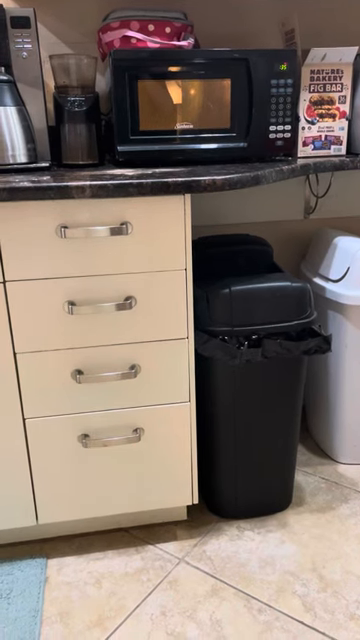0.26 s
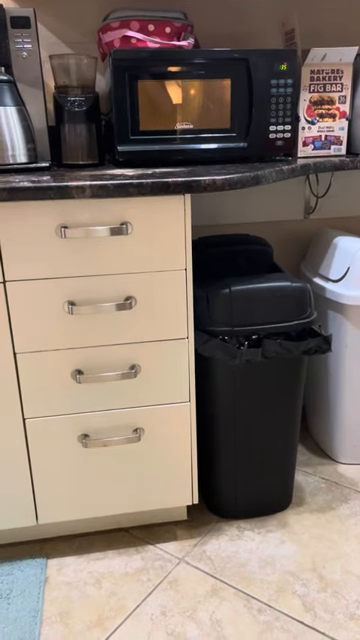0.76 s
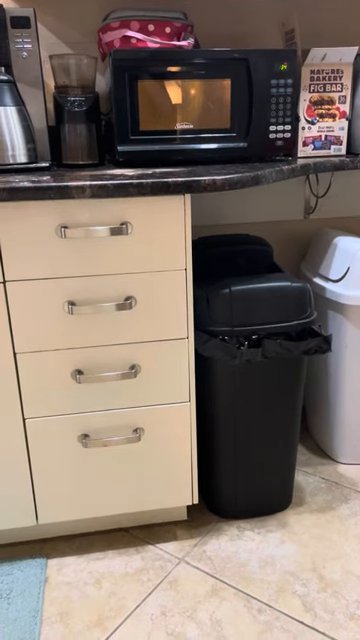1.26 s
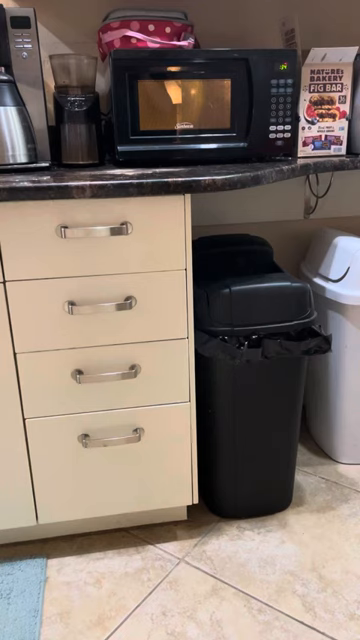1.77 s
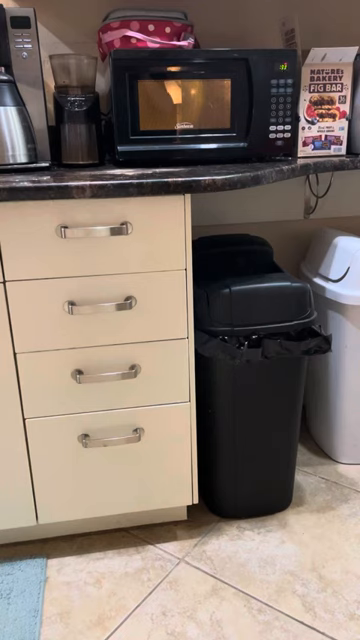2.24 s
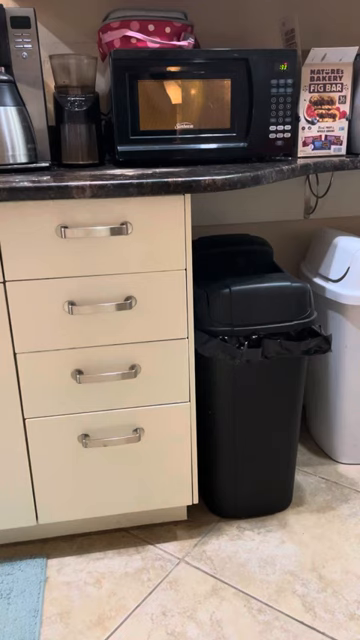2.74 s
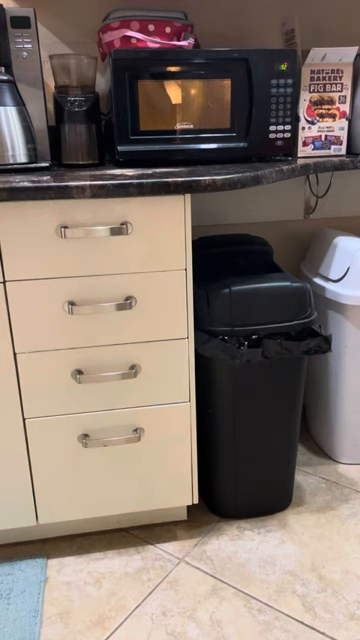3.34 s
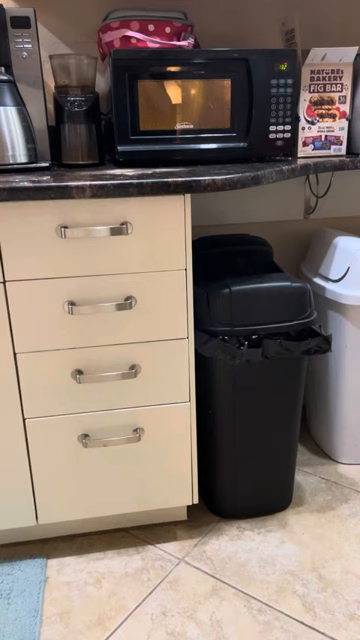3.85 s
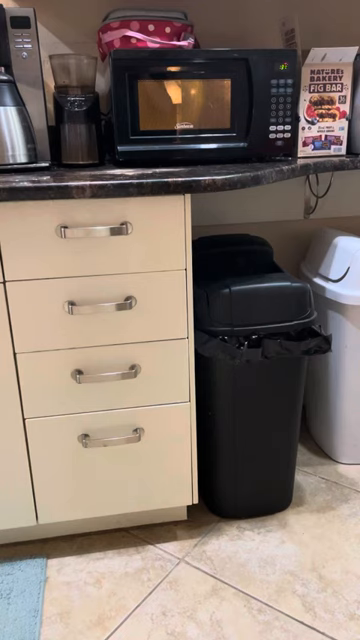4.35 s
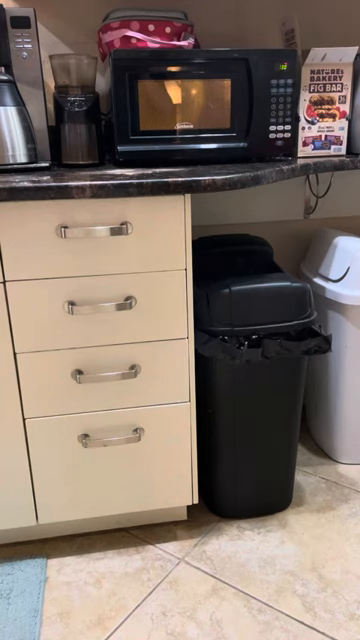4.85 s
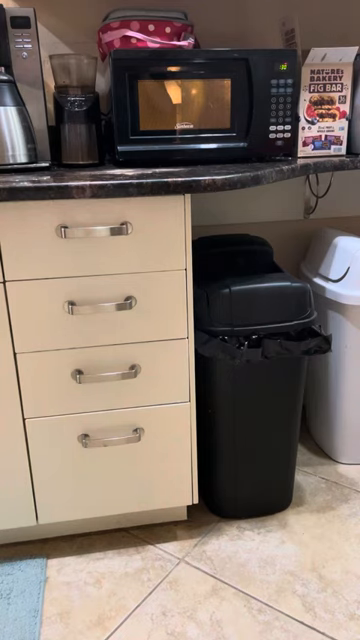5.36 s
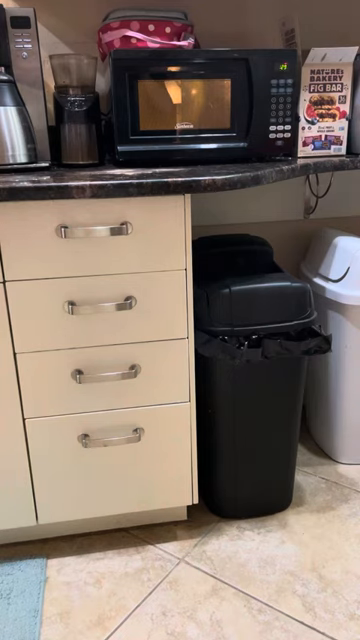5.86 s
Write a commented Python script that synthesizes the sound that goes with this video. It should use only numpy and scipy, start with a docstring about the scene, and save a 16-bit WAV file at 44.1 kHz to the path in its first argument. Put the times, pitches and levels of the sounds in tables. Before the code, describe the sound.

Steady low microwave drone and soft fan rush, interrupted by irregular bursts of woody thumps, probably footsteps, and a few tiny clicks and clinks.

```python
"""A microwave oven hums on a kitchen counter: steady mains and fan tones over the shaped noise of its fan.
It is heard from across a tiled floor. Dull thumps, probably steps, land in small clusters: dying sines
ring the floor and cabinets, with a burst of clicks on top. Light ticks are puffs of noise and short rings.
A thin whistle of gliding noise comes and goes. Two close microphone ports hear left-right difference."""
import sys
import numpy as np
from scipy import signal
from scipy.fft import rfft, irfft
from scipy.io import wavfile
from scipy.ndimage import uniform_filter1d

SR = 44100
rng = np.random.default_rng(int(sys.argv[2]) if len(sys.argv) > 2 else 0)


def master_out(mix):
    """Clip the mix to full scale and print it as 16-bit PCM to the path in sys.argv[1]."""
    frames = np.transpose(np.atleast_2d(mix))
    ceiling = np.clip(frames, -1, 1)
    pcm = np.round(ceiling * 32767).astype(np.int16)
    wavfile.write(sys.argv[1], SR, pcm)


N = 269010  # length in samples

# Transformer hum tones: mains_multiple, level_db
HUM_TONES = [(2, -47.5), (3, -48.5), (4, -41.5), (5, -60.5), (6, -44), (8, -58), (10, -60.5), (11, -62),
             (15, -73.5)]
# Fan motor tones: pitch_hz, level_db
FAN_TONES = [(49, -67), (163.5, -51.5), (327, -52.5)]
# Colour of the air rush in the port sum, then in the difference: pitch_hz, relative_level_db
RUSH_COLOUR = [(15, -66), (25, -33.5), (65, -13.5), (108, -7), (190, -9.5), (237, -5.5), (288, -10),
               (359, -8), (415, -16), (614, -8.5), (953, -25.5), (2730, -36), (5020, -48), (7800, -60.5),
               (8600, -68.5), (11200, -106), (18900, -120)]
RUSH_SIDE_COLOUR = [(35, -81), (60, -57), (227, -5), (363, -5), (417, -8), (621, -4.5), (1440, -17),
                    (1820, -26.5), (2460, -18.5), (3660, -23.5), (4420, -34), (7920, -36.5), (16000, -60)]
# Resonances of the oven case: pitch_hz, width_hz, lift_db
CASE_RESONANCES = [(175, 32, 0), (244, 66, 0), (537, 310, 3), (1400, 6.6, 13), (2080, 55, 4), (2680, 65, 9),
                   (5090, 200, 4)]
# Level of the hiss against the rest of the rush: time_s, lift_db
HISS_LEVEL = [(0, 5.5), (.6, 6.5), (2.2, 6), (3.4, 5.5), (4.1, 8.5), (4.9, 10), (5.7, 5), (6.1, 8)]
# Thumps: start_s, knock_level_db, knock_pitch_hz, knock_length (factor), then low_ring_db, boom_db,
# slap_db, grit_db (all relative to the knock), crack_pitch_hz
THUMPS = [(0.679, -31.5, 590, 1, 4, -6, -18.5, -14, 1730),
          (0.709, -39.5, 650, 0.47, 12.5, 7, -13, -20, 2760),
          (0.747, -33.5, 640, 0.62, 3, -1, -17.5, -20, 2600),
          (1.036, -27, 582, 1.2, -8.5, -12, -18.5, -32, 2600),
          (1.067, -18.5, 531, 1.7, 3.5, -11, -13, -10, 2300),
          (1.091, -13.5, 665, 1, 1.5, -10, -14.5, -21, 2890),
          (1.102, -13.5, 662, 1.2, -1.5, -12.5, -18.5, -24, 3940),
          (1.117, -16.5, 678, .9, 5.5, 3.5, -22, -20.5, 1467),
          (1.133, -20.5, 680, .9, -6, -1, -24.5, -27, 2960),
          (1.155, -24, 632, 0.78, -12, -9.5, -26, -19.5, 2835),
          (1.197, -32.5, 664, 0.61, -7, -18, -16.5, -21.5, 1480),
          (1.541, -32, 650, 0.61, -0.5, -12, -22, -26, 1770),
          (1.577, -27.5, 696, 0.73, 0.5, -20, -21.5, -30.5, 2640),
          (1.96, -41, 654, .9, 5.5, 2, -19, -30, 2790), (2.4, -34, 600, 0.73, -18.5, -21, -24, -26.5, 2750),
          (2.444, -33.5, 645, 1.2, -14, 2, -22.5, -27.5, 2750),
          (2.631, -27, 638, .6, -7.5, -14, -27, -23.5, 2164),
          (2.654, -34.5, 590, 0.74, 9, -10.5, -15.5, -26, 2600),
          (2.686, -36, 640, .9, -3, 0.5, -17, -26.5, 2700),
          (2.737, -21, 640, 0.58, -8.5, -18, -26, -41.5, 2630),
          (2.76, -34, 570, .9, 2, -0.5, -18.5, -32, 2170),
          (2.793, -45.5, 657, .9, 6, -6, -13.5, -28.5, 1450),
          (2.992, -21, 650, 1, 0.5, -17, -15, -18, 1654), (3.04, -27, 617, .9, -4.5, -14, -18, -29, 2810),
          (3.062, -26, 632, 1.6, -4, -5.5, -23.5, -22, 1950),
          (3.087, -27, 647, 2.3, -6, -9, -16.5, -28.5, 1980),
          (3.109, -17.5, 712, 0.48, -23.5, -26, -16, -19.5, 4000),
          (3.114, -8, 730, .55, -9, -20.5, -28.5, -34.5, 2820),
          (3.141, -27, 597, 0.46, 6, 4.5, -8.5, -21.5, 2910), (3.16, -29.5, 604, 0.7, 6, 0, -15, -23, 2910),
          (3.171, -31.5, 585, 1.3, 5, -1, -24, -28.5, 3100),
          (4.179, -30.5, 650, 0.76, 3.5, 0, -23, -22, 2700),
          (4.218, -31.5, 640, 0.98, -18.5, -24, -22, -25.5, 2680),
          (4.465, -20.5, 653, .9, 0, -16.5, -18, -22, 2190),
          (4.488, -4, 665, 0.51, -5, -26, -23, -27, 3780),
          (4.501, -12, 670, 0.38, -3.5, -10, -22.5, -26.5, 4580),
          (4.529, -19.5, 554, 0.92, 3.5, -17, -13, -18, 2380),
          (4.543, -25, 656, 0.97, -9, -9, -11.5, -9, 1850),
          (4.557, -15, 728, 0.97, -7.5, -9, -22, -22.5, 1546),
          (4.578, -20.5, 730, .8, -2.5, -6, -22, -22, 2400),
          (4.599, -21, 697, .8, -7.5, -13.5, -21, -23, 2460),
          (5.813, -40.5, 650, 1, 1, -10, -19.5, -28.5, 1970)]
# Floor and cabinet modes: pitch_hz, relative_level_db, time_to_fall_60_db_s
BODY_MODES = [(70.6, -16.5, 0.23), (92.8, -7, 0.22), (108.6, 0, 0.21), (130, -20, 0.056), (161.3, -8, 0.41),
              (182.7, -4.5, 0.16), (220.9, 4, 0.13), (272.2, -1.5, 0.25), (304, -1, 0.074),
              (372.8, -3, 0.29), (446.7, -1.5, 0.34), (476.5, -5, 0.13), (523, -5.5, 0.19),
              (577.4, -3, 0.048), (608, 0.5, 0.056), (660.4, -2, 0.093), (716, -3.5, 0.081),
              (824, -11.5, 0.062), (910, -14, 0.031), (1014, -7.5, 0.04)]
# Colours of the slap and of the grit in a thump: pitch_hz, relative_level_db
SLAP_COLOUR = [(530, -35), (900, -11.5), (1200, -4.5), (1430, 0), (1550, -4), (2220, -8), (2420, -11.5),
               (2690, -7), (3400, -19), (4420, -35.5), (7480, -120)]
GRIT_COLOUR = [(1880, -30), (3200, -4.5), (3940, -7), (4240, -3.5), (5260, -11), (7470, -15), (12700, -27),
               (15100, -25), (16000, -25.5)]
# Thumps and ticks in the port difference: pitch_hz, gain_db
THUMP_SIDE_GAIN = [(60, -38.5), (110, -57), (200, -29.5), (380, -17.5), (700, -14.5), (1290, -3),
                   (1900, -12.5), (2500, -1), (3500, -3.5), (16000, -2.5)]
# Ticks made of noise: start_s, level_db (before fading), centre_hz, fade_time_constant_s
PUFFS = [(0.892, -52, 6550, 0.013), (1.272, -46.5, 6780, 0.015), (1.588, -54.5, 6070, 0.012),
         (3.454, -60, 9000, 0.0064), (3.694, -55.5, 5940, 0.012), (3.922, -52, 6850, 0.0084),
         (4.946, -42.5, 2610, 0.0097), (5.092, -54, 6800, 0.031), (5.699, -65, 7920, 0.025),
         (5.966, -64, 6900, 0.2)]
# Small clinks: start_s, level_db, tilt_db_per_octave (above the lowest mode)
CLINKS = [(5.1542, -38.5, 0), (5.206, -50, -29), (5.391, -42.5, -1.5), (5.399, -43.5, -0.5),
          (5.439, -50, -20)]
# What the clinks ring with: pitch_hz, relative_level_db, time_to_fall_60_db_s
CLINK_MODES = [(2620, -3, 0.049), (2850, -5, 0.035), (3820, -4, 0.03), (4080, -1.5, 0.03),
               (6480, -14.5, .06), (8450, -16, .09), (13700, -9, 0.036), (14050, -8.5, .06)]
# Snaps, a hard edge ringing inside the loud thumps: start_s, level_db, pitch_hz, time_to_fall_60_db_s
SNAPS = [(1.067, -35, 2065, 0.048), (1.07, -43, 5850, .04), (1.071, -42.5, 3960, .03),
         (1.106, -37.5, 4500, 0.028), (1.178, -39.5, 1450, .05), (2.994, -37.5, 2340, 0.048),
         (3, -42, 1560, 0.056), (3.008, -37, 2316, .04), (3.109, -41, 3810, 0.056),
         (3.111, -46.5, 4840, .04), (3.113, -45, 2730, .05), (4.494, -26.5, 4400, 0.058),
         (4.496, -33.5, 1494, 0.048), (4.548, -37, 2310, 0.027), (4.577, -35.5, 1610, 0.045)]
# Thin whistle, one table a strand: time_s, pitch_hz, level_db
WHISTLE_STRANDS = [
    [(3.95, 6950, -84), (4.1, 6360, -72), (4.25, 5930, -66.5), (4.32, 5800, -69), (4.4, 6000, -74),
     (4.83, 5910, -71.5), (4.9, 5880, -78), (5.02, 5900, -77), (5.1, 5660, -85)],
    [(3.7, 5140, -80), (3.9, 5470, -75), (4.1, 5500, -71), (4.3, 5300, -73)],
    [(3.72, 7300, -82.5), (3.9, 7260, -83), (4.1, 7540, -79), (4.2, 7550, -80)],
]
# Share of the difference that is the sum a quarter cycle ahead: pitch_hz, share (-1 to 1)
AHEAD_SHARE = [(100, 0.086), (900, -0.73), (1460, 0.74), (1900, -0.06), (2700, .6), (3600, 0), (4700, .2),
               (5600, .6), (8000, 0.74), (16000, .8)]
# Share of the difference that is the sum in step, heard as a lean to the left: pitch_hz, share (-1 to 1)
LEFT_SHARE = [(100, .4), (300, 0.54), (600, .4), (1000, 0.59), (2000, 0), (16000, 0.059)]
# How fast the room falls silent: pitch_hz, time_to_fall_60_db_s
ROOM_DECAY = [(100, 0.16), (500, 0.35), (2000, 0.29), (6000, 0.27), (16000, 0.31)]
# Level of the room sound; the low modes already hold the room: pitch_hz, gain_db
ROOM_GAIN = [(200, -26.5), (400, -11), (700, -3), (1000, 3.5), (3000, -1.5), (8000, 2)]
# Treble dipping deeply in the port sum: pitch_hz, gain_db
SUM_TREBLE_DIP = [(3500, -1.5), (5000, -1.5), (7500, -3), (9000, -14.5), (12000, -50.5), (14000, -13),
                  (15000, -7.5)]

MAINS_HZ, EDGE_HZ = 60, 15750
RUSH_DB, RUSH_SIDE_DB = -44, -59  # before the slow changes
WAVER_DB, PATCH_DB = 0.5, 2.5  # typical wander of the hum tones and of the air patches
HUM_SCATTER, LOW_SCATTER, KNOCK_SCATTER = 0.19, 0.4, 0.57  # starting phases, in cycles
BOOM_TOP_HZ, LOW_RING_TOP_HZ = 140, 420  # where the three groups of body modes meet
BLOW_RISE_S, KNOCK_RISE_S, CRACK_RISE_S = 0.0041, 0.0012, 0.0025
KNOCK_LAG_S, KNOCK_SPREAD, DETUNE = 0.00517, 0.063, 0.015  # the two spreads are shares of the pitch
BOUNCE_S, BOUNCE_SPREAD, BOUNCE_DB, BOUNCE_CRACK_DB = 0.013, 0.2, -9.5, -1.5
CRACK_OVERTONE, SNAP_PAIR = 1.42, 0.045  # pitch ratio, and share of the pitch to either side
ECHO_SPREAD_DB = 3.5  # some reflections stand out, so tails break into grains


def gain_of(db):
    """Turns decibels into amplitude."""
    return 10 ** (np.asarray(db) / 20)


def evened(x):
    """Scales a signal to rms 1."""
    return x / np.sqrt(np.mean(x ** 2) + 1e-20)


def read(points, hz):
    """Reads a table of pitch and value, with pitch on a log axis."""
    f, value = np.transpose(points)
    return np.interp(np.log(hz + 1), np.log(f + 1), value)


def add(mix, start_s, sound):
    """Mixes a sound in at its start time."""
    part = mix[round(start_s * SR):][:len(sound)]
    part += sound[:len(part)]


def rise(t, time_s):
    """A smooth swell from silence to full level."""
    return 1 - np.exp(-t / time_s)


def slow_drift(top_hz):
    """Slow random wander of rms 1: a sum of sines of chance phase, weaker as they get faster."""
    t = np.arange(0, N + 64, 64) / SR
    speeds_hz = np.geomspace(top_hz / 20, top_hz, 20)
    waves = sum(np.sin(2 * np.pi * (f * t + rng.random())) / np.sqrt(f) for f in speeds_hz)
    return np.interp(np.arange(N) / SR, t, evened(waves))


def difference(near, other, tie):
    """Spectrum of the port difference at the level of the sum: partly tied to it, the rest unrelated."""
    hz = np.fft.rfftfreq(N, 1 / SR)
    share = tie * (read(LEFT_SHARE, hz) + 1j * read(AHEAD_SHARE, hz))
    share /= np.maximum(abs(share), 1)
    return share * rfft(near) + np.sqrt(1 - abs(share) ** 2 + 1e-9) * rfft(other)


def ring(modes, t, phase, centre_hz=1000, reach=10):
    """Dying sines, as from a struck object; the blow drives most the modes near its centre."""
    hz, db, t60 = np.transpose(modes)[:, :, None]
    drive = gain_of(db - 9.4 * (np.log(hz / centre_hz) / reach) ** 2)
    fade = gain_of(-60 * t / t60)
    waves = drive * fade * np.sin(2 * np.pi * (hz * t + phase[:len(modes), None]))
    return waves.sum(0) / np.linalg.norm(drive)


def crackle(colour, clicks_per_s, spread_db):
    """Sparse clicks of uneven size given a colour, rms 1."""
    size = gain_of(spread_db * np.minimum(rng.exponential(1, N), 3))
    clicks = (rng.random(N) < clicks_per_s / SR) * size * rng.choice([-1, 1], N)
    hz = np.fft.rfftfreq(N, 1 / SR)
    return evened(irfft(rfft(clicks) * gain_of(read(colour, hz)), N))


def patchy(x):
    """Air noise drifts in chance patches about 200 Hz by 80 ms, alike in sum and difference."""
    z = signal.stft(x, nperseg=1024, noverlap=768, boundary="even")[2]
    field = uniform_filter1d(rng.standard_normal(z.shape[1:]), size=5, axis=0)
    field = uniform_filter1d(field, size=14, axis=1)
    gain = evened(gain_of(PATCH_DB * evened(field)))
    return signal.istft(z * gain, nperseg=1024, noverlap=768)[1][:, :N]


def kitchen(x):
    """Room reflections: two unrelated tails of sparse taps, each band dying at its own speed."""
    taps = np.zeros((2, SR // 2))
    starts = np.arange(200, SR // 2 - 20, 20)
    shape = (2, len(starts))
    places = starts + rng.integers(0, 20, shape)
    size = gain_of(ECHO_SPREAD_DB * np.minimum(rng.exponential(1, shape), 4))
    np.put_along_axis(taps, places, rng.choice([-1., 1.], shape) * size, 1)
    hz, t, z = signal.stft(taps, SR, nperseg=256)
    fade = gain_of(-60 * t / read(ROOM_DECAY, hz)[:, None])
    tail = signal.istft(z * fade, SR, nperseg=256)[1]
    return signal.fftconvolve(x[None], tail / np.linalg.norm(tail[0]), axes=1)[:, :N]


def whistle():
    """Faint gliding lines: slow noise on a moving pitch makes each a narrow band."""
    out = np.zeros(N)
    for strand in WHISTLE_STRANDS:
        s, hz, db = np.transpose(strand)
        t = np.arange(s[0], s[-1], 1 / SR)
        smooth = uniform_filter1d(rng.standard_normal((2, len(t))), size=70)
        a, b = uniform_filter1d(smooth, size=70)
        turns = 2 * np.pi * np.cumsum(np.interp(t, s, hz)) / SR
        line = evened(a * np.cos(turns) + b * np.sin(turns))
        add(out, s[0], gain_of(np.interp(t, s, db)) * line)
    return np.array([out, 0.75 * np.roll(out, 2)])


def puffs(out, t):
    """Adds brief puffs: noise through a wide band filter twice, swelling and fading."""
    for start_s, db, centre_hz, fade_s in PUFFS:
        band = signal.butter(1, [centre_hz / 4.2, centre_hz * 2.25], "bandpass", fs=SR)
        noise = signal.lfilter(*band, rng.standard_normal(len(t)))
        puff = evened(signal.lfilter(*band, noise))
        add(out, start_s, gain_of(db) * puff * np.exp(-t / fade_s) * rise(t, 0.008))


def clinks(out, t):
    """Adds clinks of something small and hard, a shared set of modes tilted in level."""
    lowest_hz = CLINK_MODES[0][0]
    for start_s, db, tilt_db in CLINKS:
        modes = [(f, level + tilt_db * np.log2(f / lowest_hz), t60) for f, level, t60 in CLINK_MODES]
        add(out, start_s, gain_of(db) * ring(modes, t, rng.random(8)) * rise(t, 0.002))


def snaps(out, t):
    """Adds snaps, a hard edge ringing briefly as a close pair of modes."""
    for start_s, db, hz, t60 in SNAPS:
        pair = [(hz * (1 - SNAP_PAIR), 0, t60), (hz * (1 + SNAP_PAIR), 0, t60)]
        add(out, start_s, gain_of(db) * ring(pair, t, rng.random(2)) * rise(t, 0.001))


def ticks():
    """Light ticks: noise puffs together with the small rings of clinks and snaps."""
    t, out = np.arange(SR // 8) / SR, np.zeros(N)
    puffs(out, t)
    clinks(out, t)
    snaps(out, t)
    return out


def landings():
    """Every thump and its weaker rebound, in the columns of the thump table."""
    hits = []
    for start_s, db, knock_hz, length, low_db, boom_db, slap_db, grit_db, crack_hz in THUMPS:
        for k in range(2):  # 0 is the blow, 1 the rebound
            gap, tone = rng.standard_normal(2)
            hits.append((start_s + k * BOUNCE_S * (1 + BOUNCE_SPREAD * gap), db + k * BOUNCE_DB,
                         knock_hz * np.exp(KNOCK_SPREAD * tone), length, low_db, boom_db,
                         slap_db + k * BOUNCE_CRACK_DB, grit_db + k * BOUNCE_CRACK_DB, crack_hz))
    return hits


def blows():
    """Each thump rings low and middle modes and throws a short crackling burst of slap and grit."""
    t, out = np.arange(SR // 4) / SR, np.zeros(N)
    slap = crackle(SLAP_COLOUR, 1400, spread_db=1.5)
    grit = crackle(GRIT_COLOUR, 4000, spread_db=2.0)
    body = np.array(BODY_MODES)
    zone = np.searchsorted([BOOM_TOP_HZ, LOW_RING_TOP_HZ], body[:, 0])
    late = np.maximum(t - KNOCK_LAG_S, 0)  # the body answers after the crack
    for start_s, db, knock_hz, length, low_db, boom_db, slap_db, grit_db, crack_hz in landings():
        at = round(start_s * SR)
        boom_phase, low_phase, knock_phase, shift = rng.random((4, 32))
        # each blow lands elsewhere and shifts the modes a little
        detune = DETUNE * (2 * shift[:len(body)] - 1)
        modes = body * (1 + np.outer(detune, [1, 0, 0]))

        knock = ring(modes[zone == 2] * [1, 1, length], late, KNOCK_SCATTER * knock_phase,
                     centre_hz=knock_hz, reach=0.26) * rise(late, KNOCK_RISE_S)
        boom = ring(modes[zone == 0], t, LOW_SCATTER * boom_phase) * rise(t, 0.0021)
        low_ring = ring(modes[zone == 1], t, LOW_SCATTER * low_phase) * rise(t, 0.0067)
        blow = knock + gain_of(boom_db) * boom + gain_of(low_db) * low_ring

        burst = gain_of(slap_db - 60 * t / 0.077) * slap[at:][:len(t)]
        burst += gain_of(grit_db - 60 * t / 0.05) * grit[at:][:len(t)]
        burst *= rise(t, CRACK_RISE_S)
        # each blow cracks in its own colour, through two resonances
        peaks = [(crack_hz, 3.2), (crack_hz * CRACK_OVERTONE, 1.5)]
        crack = sum(lift * signal.lfilter(*signal.iirpeak(f, 7., fs=SR), burst) for f, lift in peaks)
        hit = blow * rise(t, BLOW_RISE_S) + gain_of(-6.5) * (burst + crack)
        add(out, start_s, gain_of(db) * hit)
    return out


def thumps():
    """Blows and ticks with their room sound, as port sum and difference."""
    hz = np.fft.rfftfreq(N, 1 / SR)
    heavy, light = blows(), ticks()
    wet = kitchen(heavy + 0.44 * light)  # the ticks are nearer and drier
    near = heavy + light + irfft(rfft(wet[0]) * gain_of(read(ROOM_GAIN, hz)), N)
    side = difference(near, wet[1], tie=1.44) * gain_of(read(THUMP_SIDE_GAIN, hz))
    dip = gain_of(read(SUM_TREBLE_DIP, hz) * (hz > 3200))
    bass_cut = 1 / (1 + (55 / (hz + 1)) ** 4)
    return irfft([rfft(near) * dip * bass_cut, side], N)


def rush():
    """Fan air noise lifted at the case resonances, swelling slowly, its hiss buzzing at twice the mains."""
    hz, t = np.fft.rfftfreq(N, 1 / SR), np.arange(N) / SR
    case_db = sum(db / (1 + (2 * (hz - f) / width) ** 2) for f, width, db in CASE_RESONANCES)
    near, other = rng.standard_normal((2, N))
    mid = rfft(near) * gain_of(read(RUSH_COLOUR, hz) + case_db)
    side = difference(near, other, tie=0.54) * gain_of(read(RUSH_SIDE_COLOUR, hz) + 0.6 * case_db)
    both = np.array([gain_of(RUSH_DB) * rfft(evened(irfft(mid, N))),
                     gain_of(RUSH_SIDE_DB) * rfft(evened(irfft(side, N)))])
    high = 1 / (1 + (3500 / (hz + 1)) ** 4)
    low = 1 / (1 + (hz / 110) ** 4)
    buzz = 1 + 0.046 * np.cos(2 * np.pi * 2 * MAINS_HZ * t)
    hiss_db = np.interp(t, *np.transpose(HISS_LEVEL)) + 0.39 * slow_drift(33)
    hiss = irfft(both * high, N) * gain_of(hiss_db) * buzz
    rumble = irfft(both * low, N) * gain_of(2.4 * slow_drift(10))  # the lowest air comes in lumps
    middle = irfft(both * (1 - high - low), N)
    swell = gain_of(0.48 * slow_drift(1.4) + 0.48 * slow_drift(14))
    return (patchy(middle + hiss) + rumble) * swell


def hum():
    """Transformer and fan motor tones: sines nearly in step, each wavering a little in level."""
    t, mid = np.arange(N) / SR, np.zeros(N)
    for f, db in [(k * MAINS_HZ, db) for k, db in HUM_TONES] + list(FAN_TONES):
        level = gain_of(db + WAVER_DB * slow_drift(5.2)) * np.sqrt(2)
        mid += level * np.sin(2 * np.pi * (f * t + HUM_SCATTER * rng.standard_normal()))
    # the slope of the wave grows with pitch, so the ports differ more higher up
    slope = np.gradient(mid) * SR / (2 * np.pi * 300)
    return np.array([mid, 0.017 * mid + 0.019 * slope])


def scene():
    """Sum and difference of the ports give left and right."""
    mid, side = whistle() + thumps() + rush() + hum()
    return np.array([mid + side, mid - side])


def record(dry):
    """A steep low-pass filter removes the treble above the edge."""
    low_pass = signal.firwin(511, EDGE_HZ, window=("kaiser", 9), fs=SR)
    return signal.oaconvolve(dry, low_pass[None], "same")


dry = scene()
out = record(dry)
master_out(out)
```